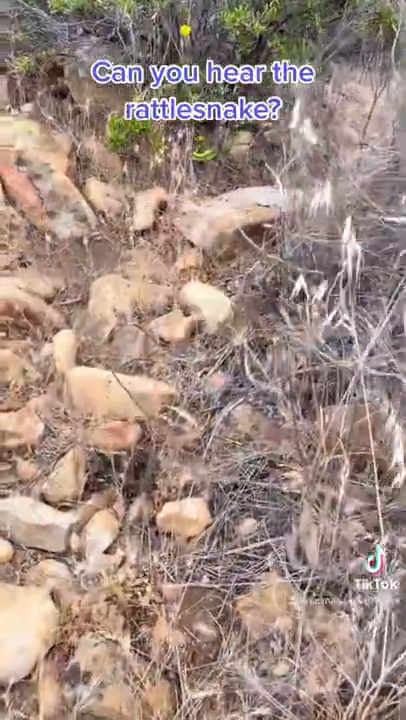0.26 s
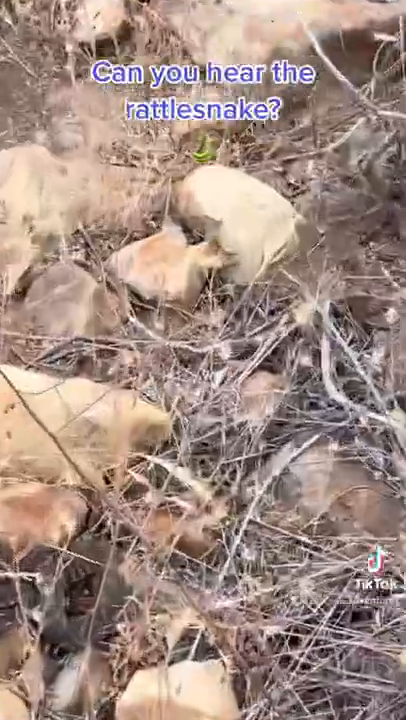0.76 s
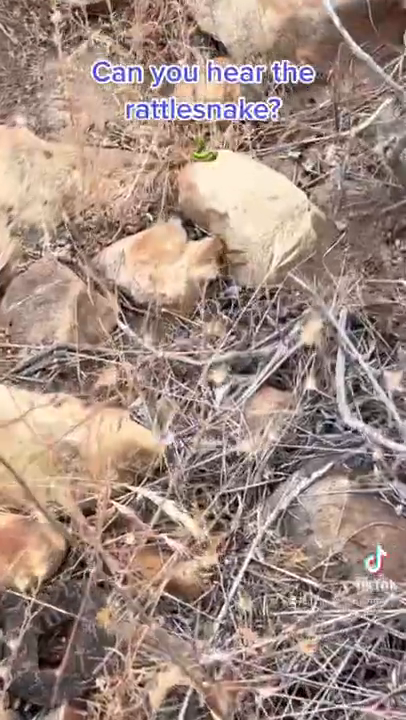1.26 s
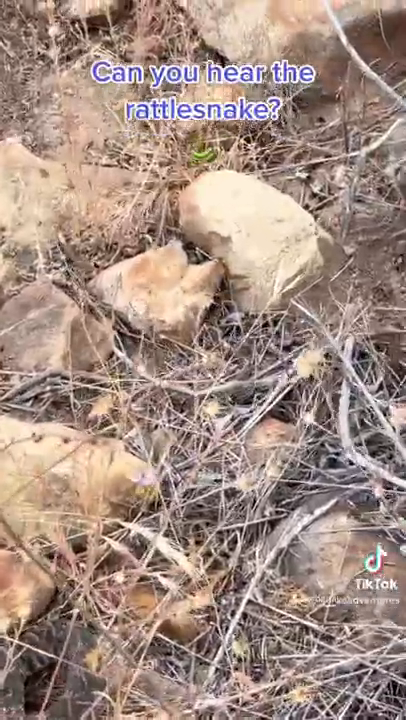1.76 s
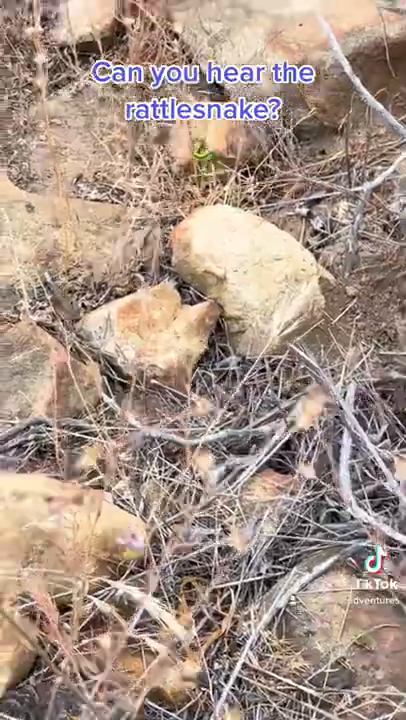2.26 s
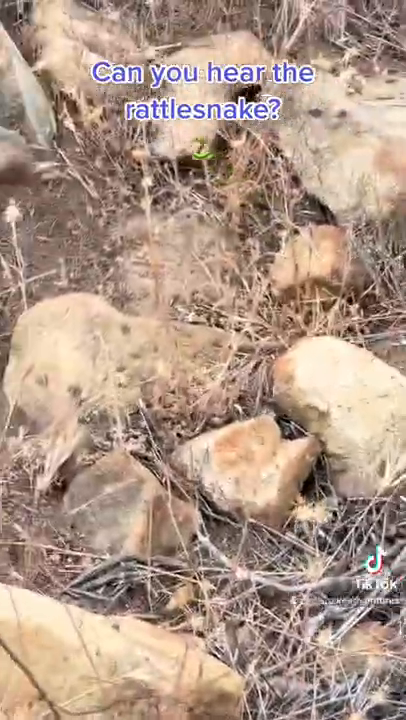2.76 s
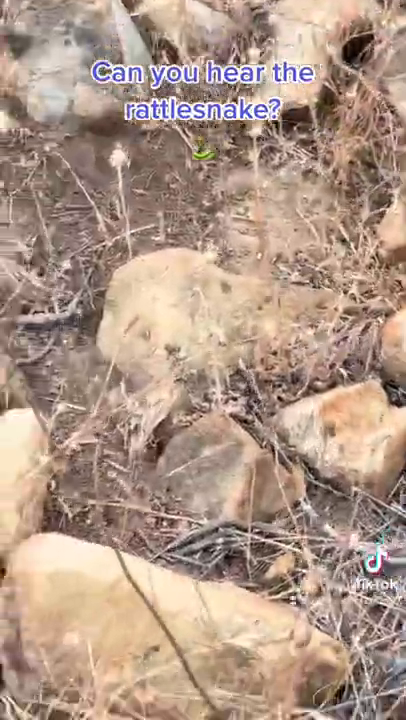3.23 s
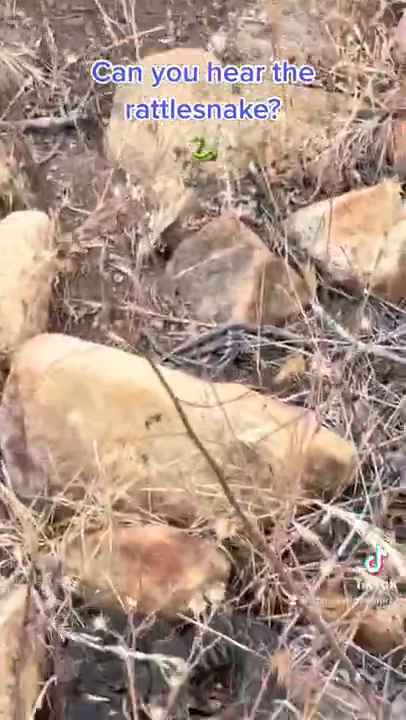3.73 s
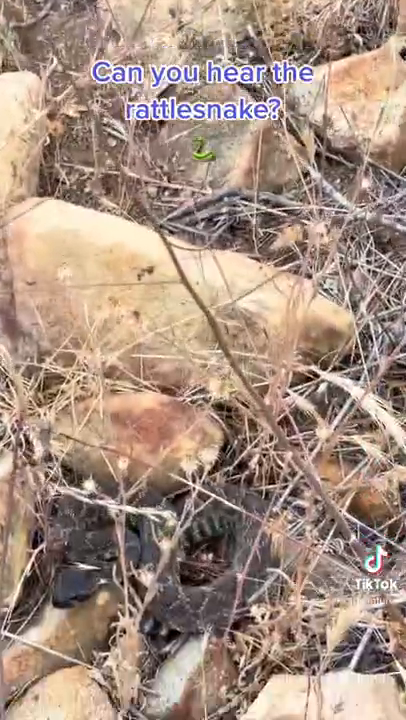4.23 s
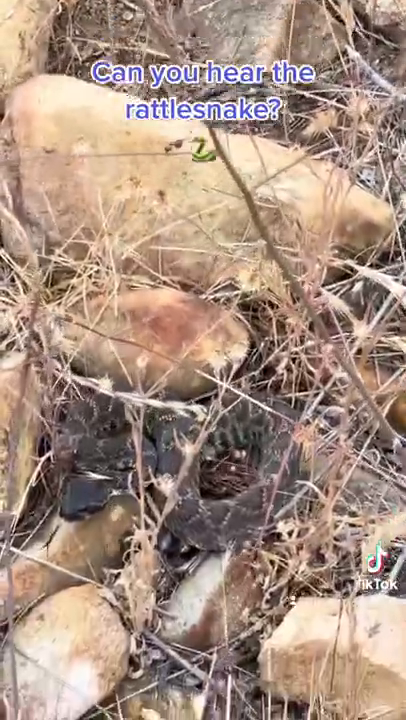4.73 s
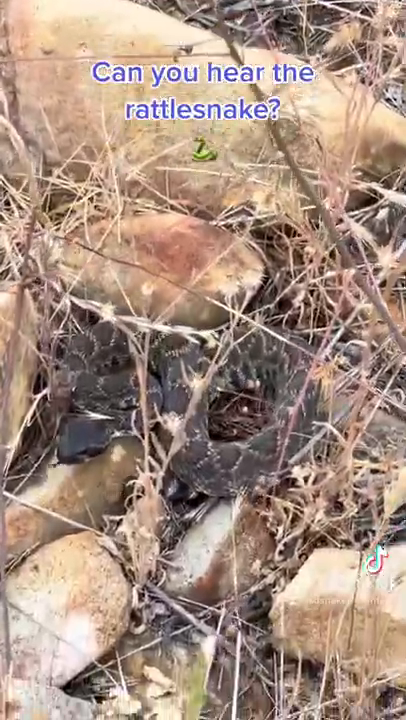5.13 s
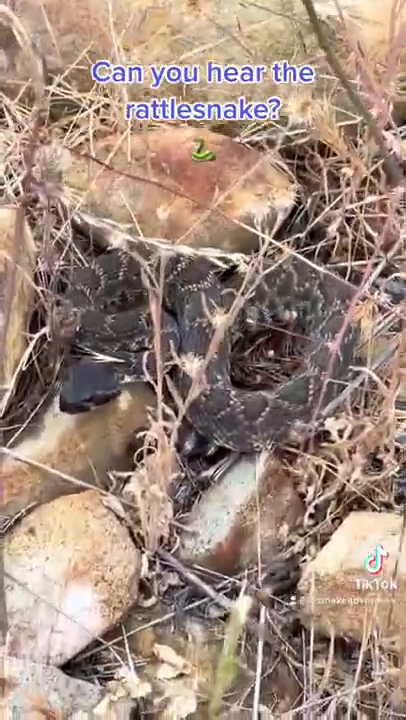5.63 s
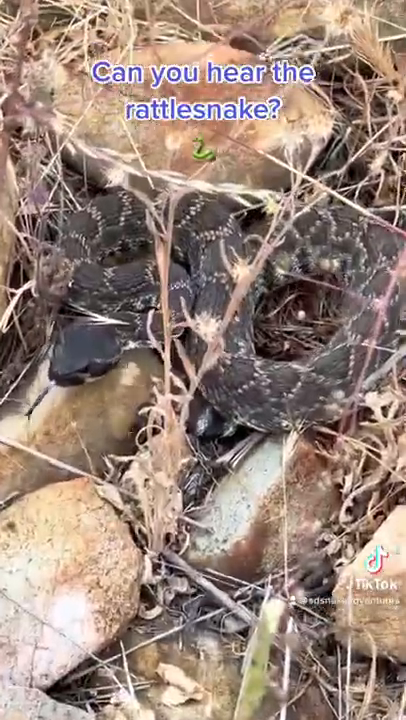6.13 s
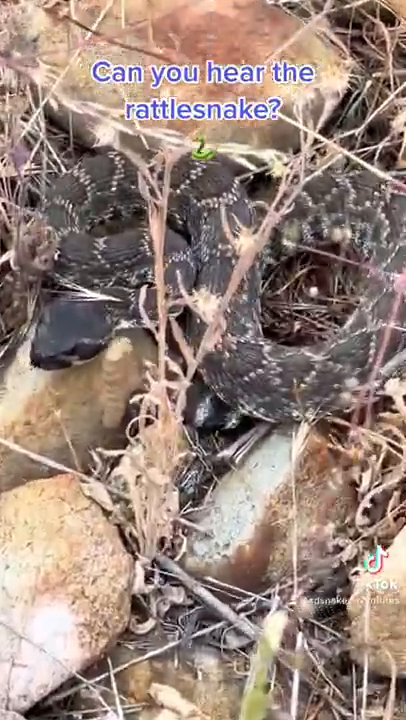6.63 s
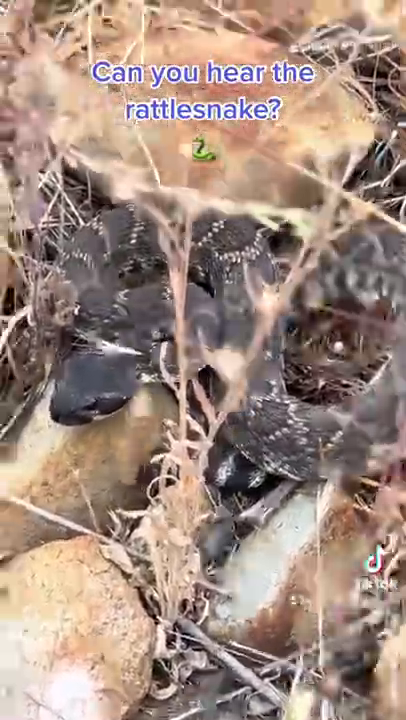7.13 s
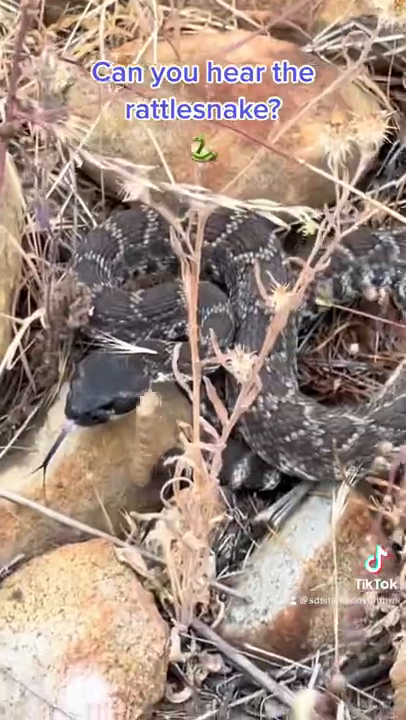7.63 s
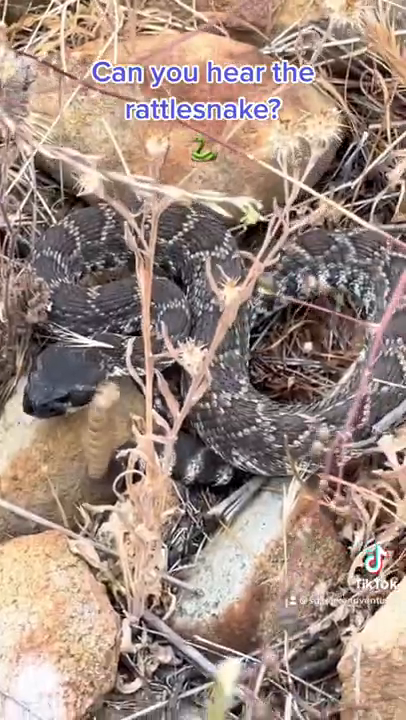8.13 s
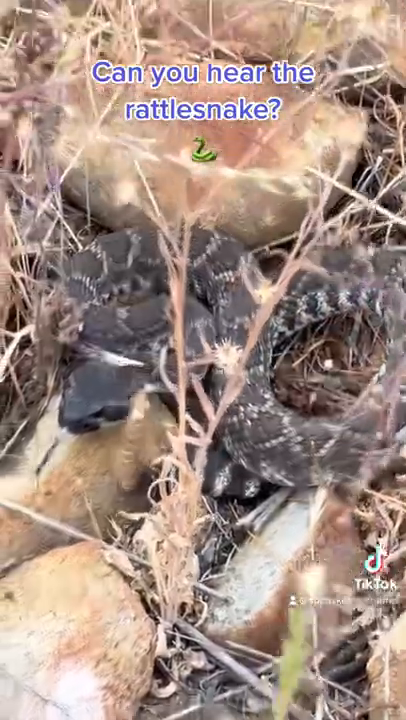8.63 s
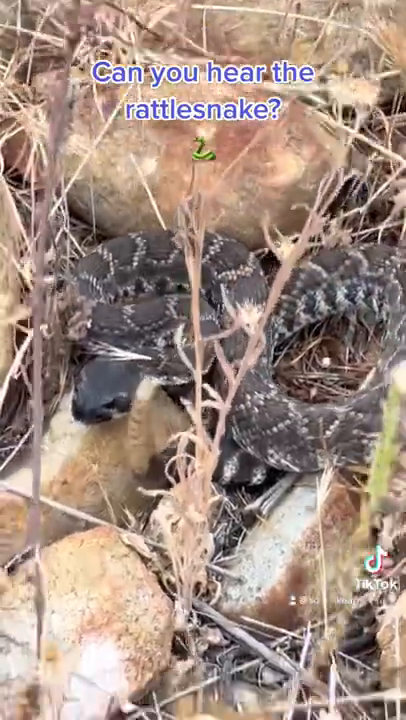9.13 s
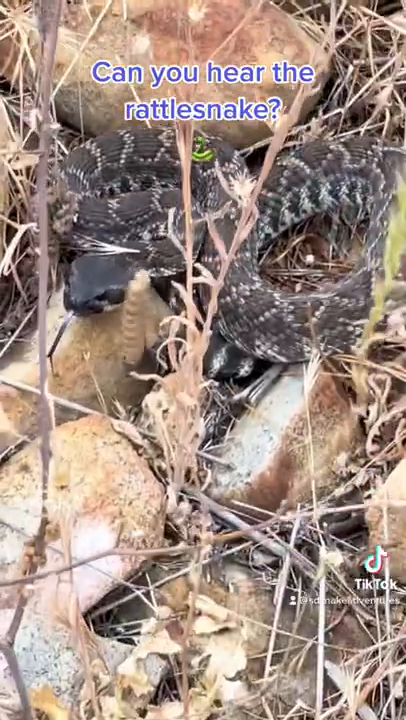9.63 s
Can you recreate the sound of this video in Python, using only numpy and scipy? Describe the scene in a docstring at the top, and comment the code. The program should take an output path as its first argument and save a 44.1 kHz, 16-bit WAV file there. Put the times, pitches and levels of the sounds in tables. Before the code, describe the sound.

Continuous fierce rattlesnake rattle outdoors on dry rocky ground, heard close on a phone. It starts a little faster and settles into a steady grainy buzz, its tone shifting subtly as the phone moves. Muffled handling thumps cluster in the first second, one more comes soon after, and tiny twig cracks dot the end. A puff of wind, low rumble and a far engine stay faint behind.

```python
"""A dry, fierce buzz comes first: a coiled rattlesnake shakes its tail among rocks and twigs, near a hand-held phone.
The tail swings about 48 times a second; on each half swing the hollow horny segments knock and chatter (shaped noise).
A few bumps (short low waves), a tap, faint twig cracks and the holder's soft rustles (noise bursts) come now and then.
Behind them lie a puff of wind and low outdoor rumble (filtered noise), and a far engine drone (summed sine waves)."""
import sys
import numpy as np
from scipy import signal
from scipy.fft import rfft, irfft
from scipy.io import wavfile

SR = 44100
rng = np.random.default_rng(int(sys.argv[2]) if len(sys.argv) > 2 else 0)


def bounce(signal):
    """Save signal as a 16-bit WAV file at the path given by the first command-line argument."""
    frames = np.transpose(np.atleast_2d(signal))
    limited = np.clip(frames, -1, 1)
    pcm = np.round(limited * 32767).astype(np.int16)
    wavfile.write(sys.argv[1], SR, pcm)


N = 435708
TIME = np.arange(N) / SR
FREQS = np.fft.rfftfreq(N, 1 / SR)
OPPOSITE = np.array([[1], [-1]])  # left port one way, right port the other

# ring of the hollow segments, a relative spectrum: f/Hz, level/dB per Hz
SHELL_RING = [(1550, -42), (1900, -27), (2400, -26.5), (2650, -17), (3100, -17.5), (3700, -9.5), (4150, -6),
              (4600, -3.8), (5500, -4.8), (6400, -7.5), (8800, -12), (10200, -10), (12600, -7.8),
              (13500, -8.5), (15700, -17.5)]
# narrow extra rings of the hollow segments: f/Hz, width/Hz, lift/dB
CAVITY_RINGS = [(2720, 140, 1.2), (6400, 220, 1.8), (10200, 1000, 3.2)]
# how large, middle and small segments follow the tail:
# lag/half swings, slack/half swings, lightness (-1 heavy to 1 light)
SEGMENT_FOLLOWING = [(.04, .1, -1), (0, .01, 0), (-.01, .03, 1)]
# timing between the two microphone ports: f/Hz, phase by which the left leads/radians
PORT_LEAD = [(3300, 0), (4150, .4), (4880, 1.6), (5150, 0), (6000, .25), (6500, .85), (8000, 2.1),
             (8700, 3.05), (9100, 3.14), (11000, 3.145), (11400, 3.22), (11800, 3.9), (13600, 5.4),
             (14200, 6.2)]
WAVER_DB, WAVER_HZ = .45, 22  # loudness of each segment group wavers: typical size, fastest rate
SCATTER_DB = -8.5  # sound scattered by the litter, against the direct sound
CLICK_DB = -3  # hard click of a knock, against its chatter


def rattle(rock_width_hz=600):
    """Large, middle and small segments chatter separately; rocks colour the sound and litter scatters it."""
    level, body, sheen, rock_hz, rock_db, *hollow_db = stance()
    strokes = np.cumsum(2 * swing_rate()) / SR  # half swings so far
    colour = read(SHELL_RING, FREQS)
    for hz, width, db in CAVITY_RINGS:
        colour = colour + db / (1 + (2 * (FREQS - hz) / width) ** 2)
    # large segments sound low, small ones high
    large = 1 / (1 + (FREQS / 4200) ** 20)
    small = 1 / (1 + (10000 / (FREQS + 1)) ** 12)
    middle = np.maximum(1 - large - small, 0)
    # share of the power, band in which the level holds/Hz, level/dB
    segments = [
        (large, (2500, 4200), body),
        (middle, (4200, 8000), 0),
        (small, (11800, 15500), sheen),
    ]
    ports = np.exp(1j * read(PORT_LEAD, FREQS) * np.array([[0], [-1]]))
    # scattered short waves reach the two ports differently, long ones alike
    apart = gain_of(SCATTER_DB) * OPPOSITE * FREQS ** 2 / (FREQS ** 2 + 4000 ** 2)
    out = np.zeros((2, N))
    for (share, band, db), (lag, slack, lightness) in zip(segments, SEGMENT_FOLLOWING):
        direct, scattered = ring(collisions(strokes, lag, slack, lightness, CLICK_DB), colour)
        direct = direct + (gain_of(rock_db) - 1) * resonate(direct, rock_hz, rock_width_hz)
        spectrum = ports * rfft(direct) + apart * rfft(scattered)
        sound = irfft(spectrum * np.sqrt(share), N)
        wavering = gain_of(db + WAVER_DB * wander(WAVER_HZ))
        out += sound / band_rms(sound.mean(0), *band) * wavering
    out += irfft(ports * rfft(hollows(strokes, hollow_db)), N)
    return shadowed(out) * gain_of(level)


# knocks that run down the rattle in each half swing: delay/half swings, scatter/half swings,
# relative level/dB, extra in light segments and less in heavy ones/dB
KNOCK_RUN = [(.05, .028, -.7, 1.8), (.19, .06, -3.2, -.8), (.41, .04, .3, -1.1), (.63, .055, -3, -.5)]
CHATTER_S, LOOSE_DB = .00095, -3.9  # time for chatter power to fall to 1/e; loose jostling between knocks
UNEVEN_DB, LOPSIDED_DB = 1.5, .5  # chance differences; harder one way and softer back by this much


def collisions(strokes, lag, slack, lightness, click_db):
    """Half swings throw segments together: each knock is a hard click and a short burst of tiny contacts."""
    count = np.arange(int(strokes[-1]))
    chance = np.clip(rng.standard_normal((len(count), len(KNOCK_RUN), 2)), -1.7, 1.7)
    blows = np.zeros(N)
    for k, (delay, scatter, db, light_db) in enumerate(KNOCK_RUN):
        when = count + lag + delay + np.hypot(scatter, slack) * chance[:, k, 0]
        at = np.interp(when, strokes, np.arange(N)).astype(int)
        strength = db + lightness * light_db + UNEVEN_DB * chance[:, k, 1]
        strength = strength + LOPSIDED_DB * (-1) ** count
        np.add.at(blows, at, gain_of(strength) ** 2)
    chatter = signal.lfilter([1], [1, -np.exp(-1 / (CHATTER_S * SR))], blows)
    click = blows * CHATTER_S * SR * gain_of(click_db) ** 2
    energy = chatter + click + gain_of(LOOSE_DB) ** 2
    # two rows of contacts: heard directly, and heard through the litter
    return np.sqrt(energy) * rng.choice([-1, 1], (2, N))


# the two largest hollows: f/Hz, width/Hz, sharp at first by f/Hz,
# lag/half swings, lightness (-1 to 1)
LARGE_HOLLOWS = [(4580, 220, 220, -.02, -1), (5210, 280, 65, -.03, 0)]
SAG_S = 0.32  # time constant with which the sharp pitch sags
HOLLOW_DRIFT, DRIFT_HZ = .016, 7  # typical pitch drift as a share, and its fastest rate
SKIRT_HZ = 1000  # a second, wider resonance confines each ring
HOLLOW_CLICK_DB = 5  # hard click against chatter


def hollows(strokes, levels):
    """The two largest hollows ring on their own knocks; pitch wanders as the loose segments shift."""
    out = np.zeros(N)
    for (hz, width, sharp_hz, lag, lightness), db in zip(LARGE_HOLLOWS, levels):
        drift = 1 + HOLLOW_DRIFT * wander(DRIFT_HZ)
        pitch = (hz + sharp_hz * np.exp(-TIME / SAG_S)) * drift
        knocks = collisions(strokes, lag, 0, lightness, HOLLOW_CLICK_DB)[0]
        ringing = resonate(resonate(knocks, pitch, width), pitch, SKIRT_HZ)
        out += evened(ringing) * gain_of(db)
    return out


STARTLED_HZ, RESTING_HZ, SETTLE_S = 50.4, 47.35, 1.35  # full swings a second; settling time constant
UNSTEADY_HZ, UNSTEADY_RATE_HZ = .22, 4  # typical wander in swings a second, and its fastest rate
SPURT_AT_S, SPURT_S, SPURT_HZ = 8.7, .7, .8  # late speed-up: middle, length, extra swings a second


def swing_rate():
    """Tail swings a second: the startle wears off, then comes a small spurt; the pace is never quite even."""
    startle = (STARTLED_HZ - RESTING_HZ) * np.exp(-TIME / SETTLE_S)
    pace = RESTING_HZ + startle + SPURT_HZ * ease(SPURT_AT_S, SPURT_S)
    return pace + UNSTEADY_HZ * wander(UNSTEADY_RATE_HZ)


# places where the phone is held; body, sheen and hollows are relative to the rattle level,
# and the rocks lift (or, below zero, weaken) one band at each place:
# middle of the move there t/s, rattle level/dB, body level/dB, sheen level/dB, rock band f/Hz, lift/dB,
# lower hollow level/dB, upper hollow level/dB
PHONE_PLACES = [(0, -40.5, -8.5, -2, 5500, 1, -4, -3), (.2, -40, -8.5, 0.5, 5500, -1, 0.5, -6.5),
                (.57, -40, -8, -2, 7340, -1, -3, -11.5), (1.75, -40.5, -7.5, -1.5, 6740, 2, -3, -6.5),
                (2.47, -41.5, -7, -3.5, 6950, 6, -3, -4.5), (3.45, -41, -7.5, -2, 7750, 3, -1, -6.5),
                (5.8, -40.5, -8, -2.5, 7880, 3.5, -1.5, -7.5), (8.8, -40.5, -9, -4.5, 7530, 4, -6.5, -7.5)]
MOVE_S = 0.29  # time from one place to the next


def stance():
    """Each column of the places at every sample: held, then gliding as the phone moves to the next place."""
    rows = np.array(PHONE_PLACES)
    out = rows[0, 1:, None]
    for old, new in zip(rows, rows[1:]):
        out = out + (new - old)[1:, None] * ease(new[0], MOVE_S)
    return out


SHADOW_LOW_HZ, SHADOW_HIGH_HZ = 2380, 4780  # band the rocks hide from the right port
CLEAR_S, CLEARING_S = 0.56, 0.093  # middle and length of its clearing


def shadowed(x, direct_db=-10, lag_radians=1.25, bounced_db=-10, bounce_s=0.0055):
    """At first a low band reaches the right port weak, late and scattered; it fills in round the rocks."""
    above = 1 / (1 + (SHADOW_LOW_HZ / (FREQS + 1)) ** 24)
    below = 1 / (1 + (FREQS / SHADOW_HIGH_HZ) ** 24)
    band = rfft(x[1]) * above * below
    bounces = rng.standard_normal(N) * np.exp(-TIME / bounce_s)
    bounced = gain_of(bounced_db) * rfft(bounces / np.linalg.norm(bounces))
    detour = gain_of(direct_db) * np.exp(-1j * lag_radians) + bounced
    change = irfft(band * (detour - 1), N)
    return np.array([x[0], x[1] + change * (1 - ease(CLEAR_S, CLEARING_S))])


# bumps on the phone: middle t/s, peak level/dB, f/Hz, time from the middle to 1/e/s
PHONE_BUMPS = [(.08, -48, 120, 0.0063), (0.112, -39.5, 76, 0.013), (.158, -40, 110, 0.0084),
               (0.191, -43, 186, 0.0064), (0.203, -43, 140, 0.0036), (0.264, -35.5, 67.4, 0.017),
               (0.363, -31.5, 75.4, 0.0038), (.383, -46.5, 650, 0.0026), (0.386, -38, 283, 0.00096),
               (0.403, -36.5, 61, 0.012), (.482, -41, 90, 0.005), (0.733, -37, 62, 0.013),
               (1.252, -30, 136, 0.0041), (7.02, -47.5, 110, 0.031), (7.509, -39, 63.3, 0.013)]


def bumps():
    """Soft pushes on the phone: short waves, mostly low, that swell and die."""
    out = np.zeros(N)
    for s, db, hz, length in PHONE_BUMPS:
        t = np.arange(-3 * length, 3 * length, 1 / SR)
        swell = np.exp(-(t / length) ** 2)
        add(out, s + t[0], gain_of(db) * swell * np.cos(2 * np.pi * hz * t))
    return out


# a tap on the case: t/s, peak level/dB, lower edge f/Hz, upper edge f/Hz
CASE_TAP = (.379, -37.5, 480, 1300)


def case_tap(ring_s=.028):
    """One sharp tap on the case rocks it sideways, so that the two ports hear it in opposition."""
    s, db, lo, hi = CASE_TAP
    t = np.arange(SR // 8) / SR
    case = signal.butter(2, [lo, hi], "band", fs=SR)
    knock = signal.lfilter(*case, rng.standard_normal(len(t)) * gain_of(-60 * t / ring_s))
    out = np.zeros((2, N))
    add(out, s, gain_of(db) * knock / abs(knock).max() * OPPOSITE)
    return out


# twig cracks: t/s, peak level/dB, middle of the band f/Hz, time for the burst to fall 60 dB/s
TWIG_CRACKS = [(7.054, -51.5, 800, .07), (7.066, -52, 560, .05), (7.512, -51, 700, .04),
               (7.668, -48, 740, .035), (7.998, -53, 1500, .03), (8.021, -46.5, 1100, .032),
               (8.507, -43, 1720, .03), (8.513, -48, 900, .025), (9.85, -50.5, 1100, .03)]


def twigs():
    """Dry twigs crack: short dull bursts with a broad woody resonance."""
    out, t = np.zeros((2, N)), np.arange(SR // 4) / SR
    for s, db, hz, t60 in TWIG_CRACKS:
        wood = signal.butter(3, [hz - 300, hz + 300], "band", fs=SR)
        crack = signal.lfilter(*wood, rng.standard_normal((2, len(t))) * gain_of(-60 * t / t60))
        crack = crack + 0.094 * crack[::-1]  # each port hears a little of the other's crack
        add(out, s, gain_of(db) * crack / abs(crack).max())
    return out


# rustles as the holder shifts: middle t/s, half length/s, level at the middle/dB, upper edge f/Hz
HOLDER_SHIFTS = [(0.21, 0.16, -64, 355), (1.89, 0.035, -63.5, 400), (2.652, 0.17, -67.5, 450),
                 (5.267, 0.14, -66, 416), (6.562, 0.075, -66.5, 220), (7.02, 0.071, -65, 202),
                 (7.7, 0.22, -73, 900), (8.62, 0.37, -69.5, 1100), (9.62, 0.28, -64.5, 344)]
SHIFT_LOW_HZ = 135  # each rustle reaches down to this pitch


def shifts(grain_db=2.0, apart_db=-6):
    """The holder shifts: dull, uneven rubbing that swells and fades."""
    common, apart = rng.standard_normal((2, N))
    rub = common + gain_of(apart_db) * apart * OPPOSITE
    rub = rfft(rub * gain_of(grain_db * wander(40)))
    rub = rub * FREQS ** 4 / (FREQS ** 4 + SHIFT_LOW_HZ ** 4)
    out = np.zeros((2, N))
    for s, half, db, hz in HOLDER_SHIFTS:
        rustle = evened(irfft(rub / (1 + (FREQS / hz) ** 4), N))
        out += rustle * gain_of(db) * np.exp(-.5 * ((TIME - s) / half) ** 2)
    return out


# a puff of wind on the ports: middle t/s, half length/s, level at the middle/dB, upper edge f/Hz
PUFF_OF_WIND = (.9, .2, -58, 150)


def wind_puff():
    """A puff of air buffets each port on its own: low noise that swells and fades."""
    s, half, db, hz = PUFF_OF_WIND
    shape = 1 / (1 + (FREQS / hz) ** 3) * FREQS / (FREQS + 30)
    buffet = irfft(rfft(rng.standard_normal((2, N))) * shape, N)
    return evened(buffet) * gain_of(db) * np.exp(-.5 * ((TIME - s) / half) ** 2)


# colour of the outdoor air, a relative spectrum: f/Hz, level/dB per Hz
AIR_COLOUR = [(15, -38), (30, -12), (43, -3), (60, 5.5), (75, 2), (100, -1), (125, -6.5), (160, -12.5),
              (200, -16), (300, -25.5), (600, -26.5), (1500, -32), (2200, -37), (4000, -95)]
# how alike the air is at the two ports: f/Hz, likeness (0 to 1)
AIR_LIKENESS = [(100, 1.0), (160, 0.99), (270, 0.84), (450, 0.092), (740, 0.041), (1300, 1)]
RUMBLE_DB, RUSTLE_DB = -58.5, -73  # settled rumble and soft rustle
FLUTTER_HZ = 16  # fastest rate at which the rustle flutters
GRIP_DB, GRIP_S = 2, 0.87  # extra rumble while the grip settles: at first, and its time constant


def air(split_hz=200, gust_db=1.05, flutter_db=0.6):
    """Low outdoor rumble, alike at both ports, and a soft wider rustle above it: two bands of noise."""
    rumble = RUMBLE_DB + GRIP_DB * np.exp(-TIME / GRIP_S)
    a, b = rfft(rng.standard_normal((2, N)))
    same = np.clip(read(AIR_LIKENESS, FREQS), -1, 1)
    z = np.array([a, same * a + np.sqrt(1 - same ** 2) * b]) * gain_of(read(AIR_COLOUR, FREQS))
    mid = irfft(z.mean(0), N)
    low = 1 / (1 + (FREQS / split_hz) ** 4)
    deep = irfft(z * low, N) / band_rms(mid, 25, 65)
    soft = irfft(z * (1 - low), N) / band_rms(mid, 250, 900)
    deep = deep * gain_of(rumble + gust_db * wander(2.2))
    return deep + soft * gain_of(RUSTLE_DB + flutter_db * wander(FLUTTER_HZ))


# loudness of the far engine's firing tone: t/s, level/dB
ENGINE_LEVEL = [(0, -73), (1.3, -53.5), (3.7, -53), (9.1, -52), (9.7, -46.5)]
# its firing tone and the multiples of it, in order: relative level/dB
ENGINE_OVERTONES = [0, -14, -28, -33]
IDLE_HZ, CRUISE_HZ, RUN_UP_S = 74.8, 77.5, 5.7  # firing rate at first and up to speed; time to get there


def engine(fading_db=0.5):
    """A far engine's firing tone and overtones gather a little speed and grow louder, wavering slightly."""
    hz = np.interp(TIME, [0, RUN_UP_S], [IDLE_HZ, CRUISE_HZ])
    db = follow(ENGINE_LEVEL)[0]
    turn = 2 * np.pi * np.cumsum(hz * (1 + 0.00616 * wander(5.6))) / SR
    tone = sum(gain_of(order_db) * np.sin(k * turn) for k, order_db in enumerate(ENGINE_OVERTONES, 1))
    return np.sqrt(2) * tone * gain_of(db + fading_db * wander(1.2))


def gain_of(db):
    """Decibels to amplitude."""
    return 10 ** (np.asarray(db) / 20)


def evened(x):
    """Scales to an rms (average strength) of one."""
    return x / np.sqrt(np.mean(x ** 2) + 1e-20)


def read(points, hz):
    """Reads a curve on a log-frequency axis."""
    f, value = np.transpose(points)
    return np.interp(np.log(hz + 1), np.log(f + 1), value)


def follow(rows):
    """Each column of a curve at every sample."""
    s, *columns = np.transpose(rows)
    return [np.interp(TIME, s, c) for c in columns]


def add(mix, s, sound):
    """Mixes a sound in at a time."""
    part = mix[..., max(round(s * SR), 0):][..., :sound.shape[-1]]
    part += sound[..., :part.shape[-1]]


def band_rms(x, lo, hi):
    """Rms of the part of x between two frequencies."""
    band = irfft(rfft(x) * ((FREQS > lo) & (FREQS < hi)), N)
    return np.sqrt(np.mean(band ** 2) + 1e-20)


def wander(hz):
    """Slow chance of rms one, up to about the given rate."""
    return evened(irfft(rfft(rng.standard_normal(N)) / (1 + (FREQS / hz) ** 4), N))


def ring(x, db):
    """Filters with the given gain so that clicks ring on only after their onset (minimum phase)."""
    cepstrum = irfft(np.log(gain_of(db)), N)
    cepstrum[1:N // 2] *= 2
    cepstrum[N // 2 + 1:] = 0
    return irfft(rfft(x) * np.exp(rfft(cepstrum)), N)


def resonate(x, hz, width):
    """A resonance of gain one that follows the curve hz: shift down, smooth, shift back up."""
    turn = np.exp(2j * np.pi * np.cumsum(hz) / SR)
    r = np.exp(-np.pi * width / SR)
    return 2 * (turn * signal.lfilter([1 - r], [1, -r], x / turn)).real


def ease(s, length):
    """Goes from zero to one around a time."""
    return np.clip((TIME - s) / length + .5, 0, 1)


def scene():
    """Adds the snake, the small knocks and rustles, and the outdoor background."""
    near = rattle() + bumps() + case_tap() + twigs() + shifts()
    return near + wind_puff() + air() + engine()


def record(dry):
    """The phone's band limit: a steep filter takes away the treble above its edge."""
    lowpass = signal.firwin(801, 15780, window=("kaiser", 9), fs=SR)  # edge in Hz
    return signal.oaconvolve(dry, lowpass[None], "same")


dry = scene()
out = record(dry)
bounce(out)
```